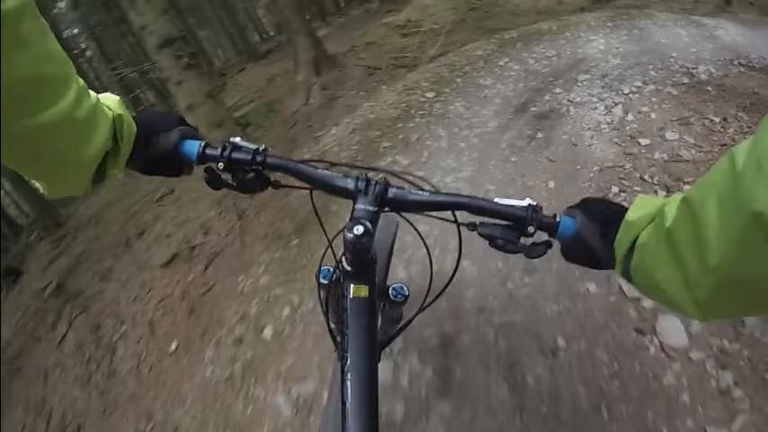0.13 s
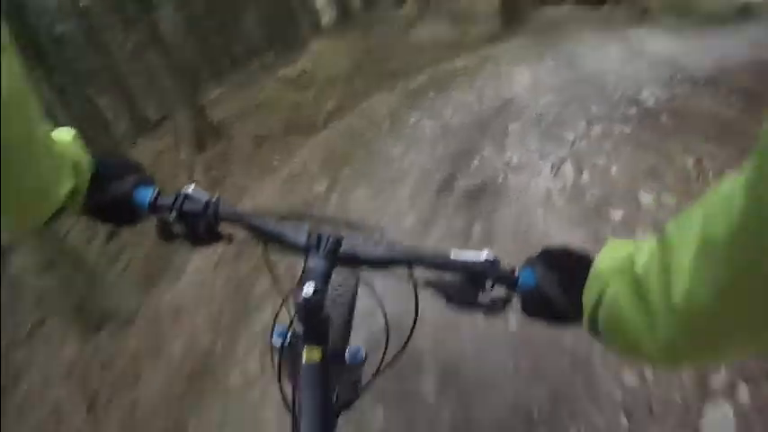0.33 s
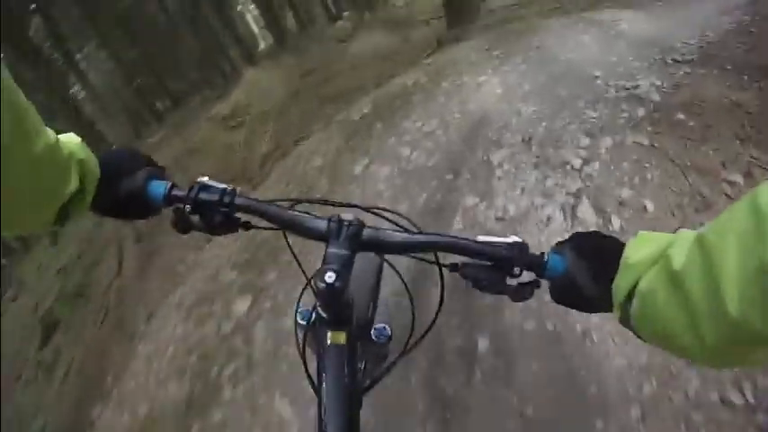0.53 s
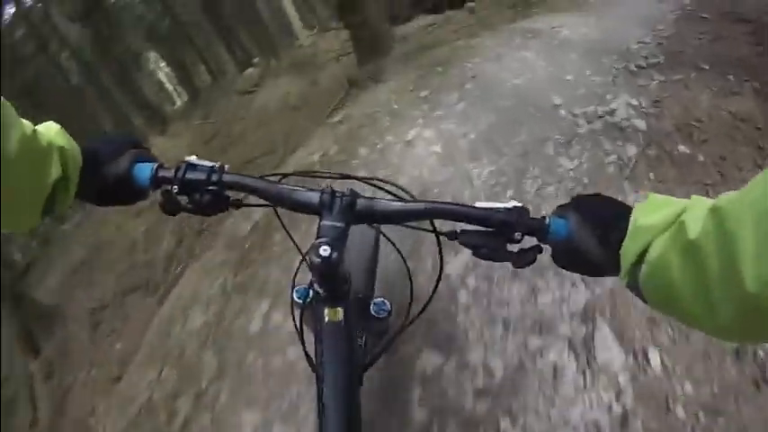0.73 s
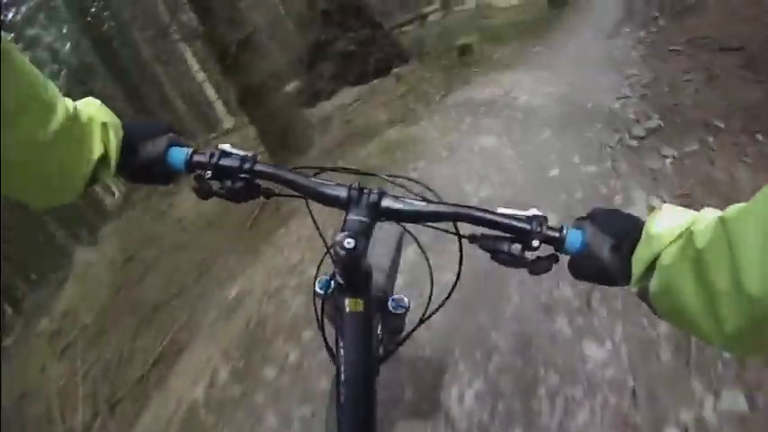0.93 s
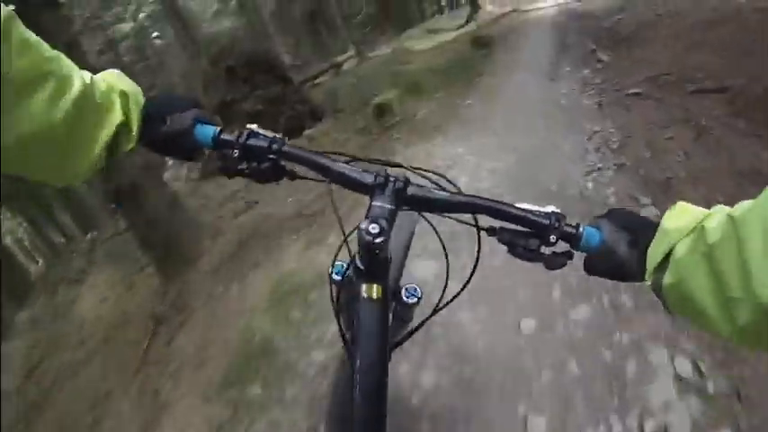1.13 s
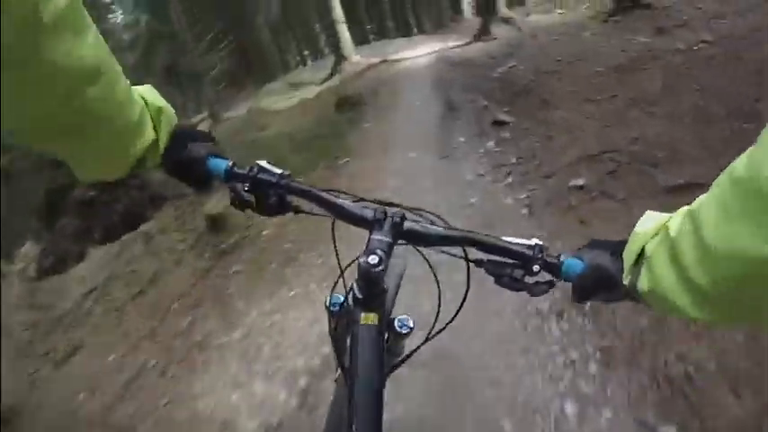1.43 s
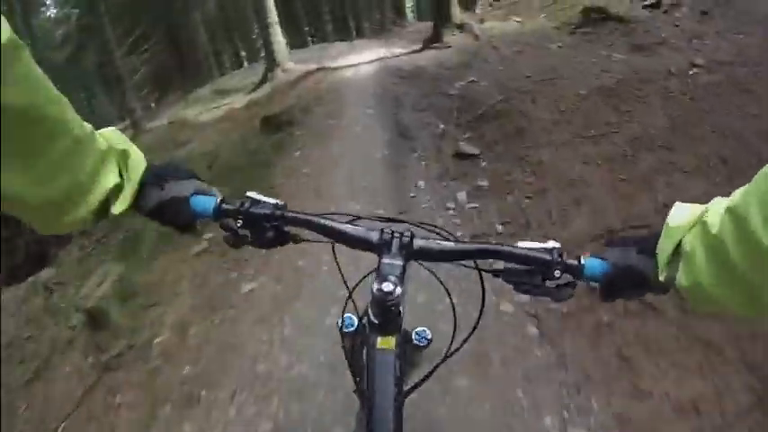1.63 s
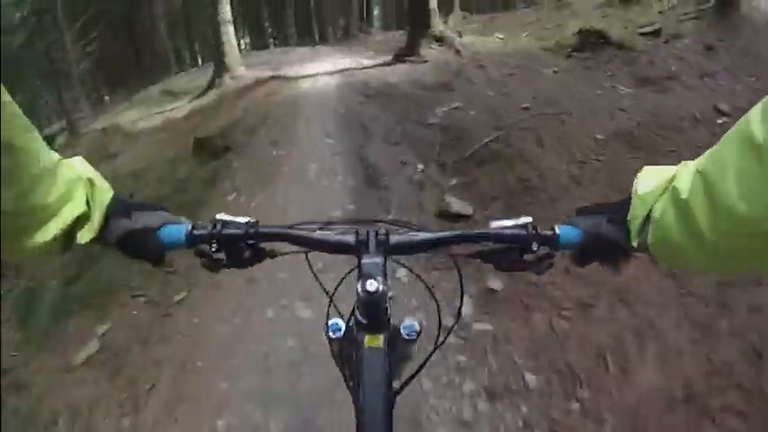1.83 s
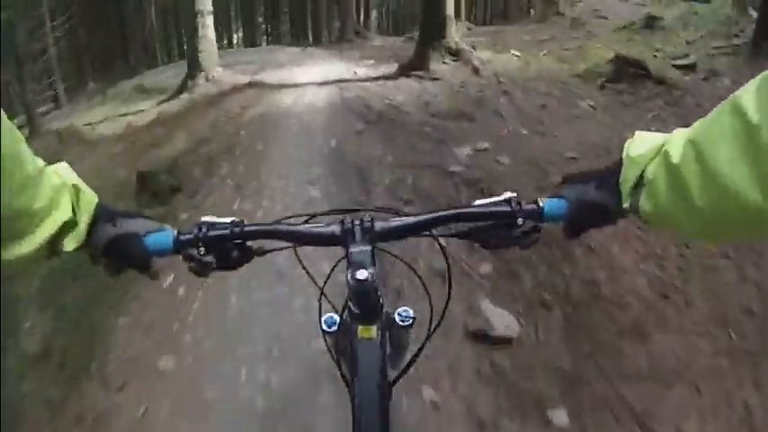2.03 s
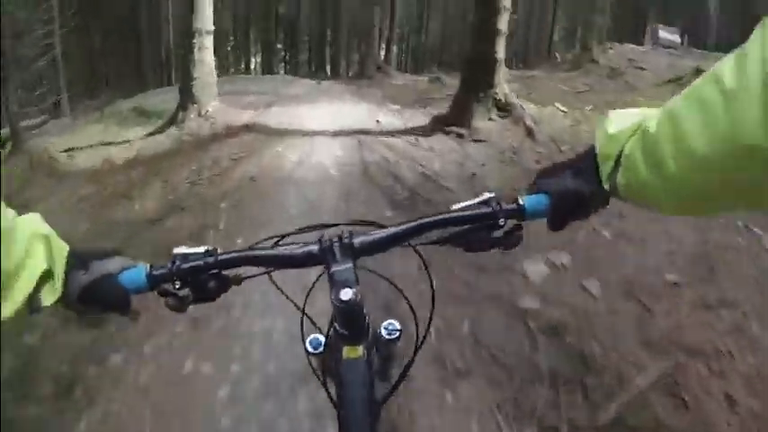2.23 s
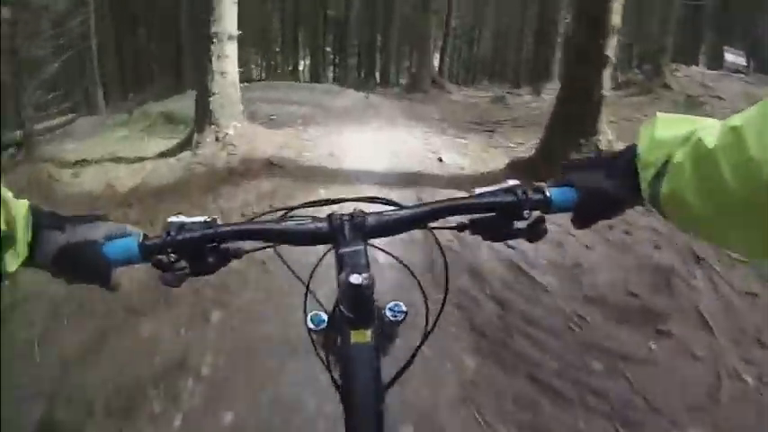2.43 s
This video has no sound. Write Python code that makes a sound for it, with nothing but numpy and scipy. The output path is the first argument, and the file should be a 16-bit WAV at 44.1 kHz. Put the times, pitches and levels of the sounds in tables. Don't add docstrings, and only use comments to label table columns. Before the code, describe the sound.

Hard clacking of a buckle against a plastic case, very close and dry; it follows fabric scuffing and one heavy low thump, with small rattling bounces between knocks and faint air and tyre rumble on a forest trail.

```python
import sys
import numpy as np
from scipy import signal
from scipy.fft import rfft, irfft
from scipy.io import wavfile

SR = 44100
rng = np.random.default_rng(int(sys.argv[2]) if len(sys.argv) > 2 else 0)


def attenuation_scalar(level_db):
    decades = np.asarray(level_db, float) / 20
    return 10 ** decades


def wav_out(sig):
    wavfile.write(sys.argv[1], SR, np.round(np.clip(np.atleast_2d(sig).T, -1, 1) * 32767).astype(np.int16))


N = 114660

# time in seconds, level in dB.
JOLTS = [(0.0, -42), (0.2, -32.5), (0.3, 19), (0.36, -40.5), (.55, -55.5), (.75, -65.5), (.82, -54.5),
         (1.05, -58), (1.28, -36.5), (1.38, -61), (1.85, -58), (2.6, -56.5)]
# time in seconds, level in dB.
TYRE_LEVELS = [(0.0, -49.5), (0.22, -43), (0.27, -19), (0.58, -71), (.69, -57), (.75, -66), (.88, -59.5),
               (1.0, -61.5), (1.28, -48), (1.38, -67), (1.7, -61), (1.82, -73), (1.87, -55.5),
               (1.97, -71.5), (2.18, -72), (2.26, -53), (2.36, -66.5), (2.6, -65.5)]
# time in seconds, signed size, width in ms.
BUMP_PUSHES = [
    (0.26, -0.11, 16),
    (0.28, 0.31, 4.9),
    (0.292, -0.39, 5.7),
    (0.297, -0.4, 9.8),
    (0.315, 0.18, 13.3),
    (0.331, -0.11, 1.8),
]
# time in seconds, level in dB, brightness 0-1.
RUBBING = [(0.0, -52.5, 0.52), (0.28, -39.5, 0.3), (0.43, -59.5, 0.62), (.62, -64.5, 0.47),
           (.75, -65, 0.51), (.95, -60.5, 0.38), (1.23, -53.5, 0.46), (1.32, -74.5, 0.67),
           (1.46, -64.5, .3), (1.62, -73, 0.33), (2.02, -72, 0.42), (2.27, -65.5, 0.76), (2.6, -67, 0)]
# start in seconds, peak in dB, length in ms, brightness 0-1.
STRAP_SCUFFS = [(0.046, -35.5, 7.8, 0.06), (0.137, -43.5, 4.2, 0.92), (.171, -58, 3.3, 0.8),
                (0.185, -41.5, 3.4, 1), (0.2, -38, 13.3, 1), (0.218, -30.5, 3.5, 0.74),
                (0.241, -55, 6.9, 0.8), (0.253, -34.5, 12.3, 1), (0.266, -27, 8.7, 1),
                (0.279, -22.5, 3.2, 0.95), (0.316, -31, 7.7, 1), (0.32, -30.5, 13, 0.34),
                (0.332, -33, 27, 0.52), (0.488, -58, 4.9, .9), (1.243, -40, 24, 0.29),
                (1.279, -48.5, 15.7, 0.9), (1.919, -46, 2.7, 1)]
# frequency in Hz, density in dB per Hz.
DULL_COLOUR = [(150, -31), (250, -13.5), (1060, -1.5), (1530, 9), (2700, 0), (2930, -6.5), (3080, 5.5),
               (4920, -10.5), (12000, -44), (15600, -56.5), (22000, -120)]
# frequency in Hz, density in dB per Hz.
BRIGHT_COLOUR = [(150, -24), (250, -7), (857, -11.5), (2430, -0.5), (4230, -4.5), (4780, -5), (5780, -8),
                 (12600, -24), (15800, -49.5)]
# frequency in Hz, density in dB per Hz.
RATTLE_COLOUR = [(290, -49), (500, -24), (1450, -0.5), (2450, -17.5), (2720, -19.5), (4230, -30.5),
                 (4690, -20.5), (6340, -27.5), (8000, -47.5), (10400, -75.5), (17600, -120)]
# frequency in Hz, width in Hz, gain.
CASE_RESONANCES = [(1540, 750, 0.92), (2000, 630, .6), (2310, 93, 0.94), (3900, 350, .5), (4540, 220, 1)]
# start in seconds, peak in dB, length in ms.
BUCKLE_BOUNCES = [(0.414, -30.5, 5.1), (.418, -32.5, 6.3), (0.606, -56.5, 8), (.638, -61, 13),
                  (0.78, -48, 3.7), (1.554, -53.5, 10), (1.613, -52, 7.8), (1.71, -45.5, 21),
                  (1.753, -47, 22.7), (1.898, -45, 30), (1.913, -53.5, 41), (1.95, -48.5, 15.5),
                  (2.065, -62, 5.1), (2.112, -41, 21.3), (2.134, -51, 27), (2.16, -55.5, 24),
                  (2.19, -57, 12.6), (2.25, -59, 29), (2.505, -51.5, 20.3), (2.521, -46, 24),
                  (2.526, -44.5, 7.9), (2.572, -68, 30)]
# time in seconds, strength, contact in ms.
KNOCK_EVENTS = [
    (.40046, 3.4, .1),
    (1.30963, 1.6, .12),
    (1.51579, 1.37, .127),
    (1.68219, 2, .105),
    (1.87296, 2.16, .12),
    (2.08528, .573, .153),
    (2.31755, 3.1, .148),
    (2.4802, .195, .18),
]
TOUCH_DELAYS_MS = [0, .928, 2.31, 4.41]
TOUCH_SHARES = [(1, 1.48, .74, 0), (1, 1.24, 1, -.27), (1, 1.26, 1.1, -.41), (1, 1.13, .97, -.2),
                (1, 1.29, .77, -.08), (1, 1.66, 1.48, -.62), (1, 1.32, .66, 0), (1, 1.69, 1.32, -.21)]
# frequency in Hz, signed gain, T60 in seconds.
WALL_MODES = [(953, -.11, .0076), (1691, 2.76, .00304), (1788, 1.235, .0118), (1856, -3.23, .0069),
              (2326, -1.06, .0026), (2871, -.09, .017)]
# frequency in Hz, level in dB, T60 in seconds.
CASE_MODES = [(1360, -35, .03), (2930, -25, .013), (3378, -26, .011), (3926, -26.5, 0.02),
              (4950, -21.5, 0.029), (5160, -27, .009), (6220, -23.5, 0.017), (8600, -31.5, 0.0028),
              (9700, -28.5, .005), (13000, -34.5, .004)]
# level in dB, treble tilt in dB per octave.
KNOCK_CRACKS = [(4, 0.85), (-0.5, -1.1), (-3, 1.5), (6.5, 2.2), (5.5, 5.4), (-17.5, 2.5), (-3, 8.2),
                (-28, 0.5)]
# frequency in Hz, level in dB, T60 in seconds.
FRAME_MODES = [(450, -10, .08), (923, -12, .09), (2393, 0, .095), (3052, -28, .17), (3451, -35, .22),
               (3607, -22, .15), (4745, -31, .2), (5642, -28, .15)]
# frequency in Hz, level in dB, T60 in seconds.
PIN_MODES = [(2848, -7, 1.3), (3204, -3, .5), (5109, -1, .42), (5281, -5, .3), (7228, -3, .2),
             (7348, -18, .3)]
# low bar, frame, low pin, mid pin and high pin, all in dB.
METAL_DRIVE_DB = [(-22.5, -26, -53.5, -56.5, -58.5), (-21, -29.5, -74.5, -65, -76.5),
                  (-22, -27, -71.5, -66, -69), (-26.5, -30.5, -62.5, -56, -63.5),
                  (-26, -29, -75, -56.5, -57), (-24.5, -32, -66, -73.5, -83),
                  (-32.5, -29, -65.5, -61.5, -60), (-29, -45.5, -81, -69, -84)]
DRIVE_COLUMNS = [1, 0, 1, 1, 1, 1, 1, 1, 2, 3, 3, 4, 4, 4]

JOLT_LOW_HZ, JOLT_HIGH_HZ, JOLT_PATCH_DB, JOLT_MAX_DB = 14, 45, 1.5, -30
TYRE_HZ, TYRE_WIDTH_HZ, TYRE_SKIRT, TYRE_PATCH_DB, TYRE_MAX_DB = 119, 59, 0.24, 3.5, -30.5
WIND_DB, WIND_LOW_HZ, WIND_HIGH_HZ = -10.5, 227, 750
FABRIC_GRAINS_PER_S, RATTLE_GRAINS_PER_S, GRAIN_SPREAD_DB, RUB_PATCH_DB = 1700, 4000, 3.5, 1.1
SHAKE_DB, HUM_HZ, HUM_WIDTH_HZ, HUM_GAIN = 2.5, 450, 76, 1.5
CHATTER_DB, CHATTER_T60_S = -12, 0.13
THUMP_HZ, THUMP_DB, THUMP_T60_S = 95, -13, 0.13
BUCKLE_SPREAD_DB, METAL_DELAY_S = 1.2, 0.003
CASE_SPREAD_DB, CRACK_CONTACT_MS, CRACK_MAX_CYCLES = 6.5, 0.041, 32
CLIP_LEVEL, CLIP_HARDNESS, CUTOFF_HZ = 0.94, 8.0, 15900

KNOCK_S, KNOCK_STRENGTH, CONTACT_MS = np.transpose(KNOCK_EVENTS)
KNOCK_START = (KNOCK_S * SR).astype(int) - 30


def rms_one(x):
    return x / np.sqrt(np.mean(x ** 2) + 1e-20)


def in_time(rows):
    s, *columns = np.transpose(rows)
    return [np.interp(np.arange(N) / SR, s, c) for c in columns]


def drift(rate_hz):
    r = np.exp(-80 * np.pi * rate_hz / SR)
    noise = rng.standard_normal(N // 40 + 2002)
    slow = signal.lfilter([1], [1, -2 * r, r * r], noise)[2000:]
    return np.interp(np.arange(N) / 40, np.arange(len(slow)), rms_one(slow))


def band_noise(low_hz, high_hz):
    sos = signal.butter(2, [low_hz, high_hz], "band", fs=SR, output="sos")
    return rms_one(signal.sosfilt(sos, rng.standard_normal(N)))


def ring(x, hz, t60_s):
    r, w = attenuation_scalar(-60 / (t60_s * SR)), 2 * np.pi * hz / SR
    return signal.lfilter([0, np.sin(w)], [1, -2 * r * np.cos(w), r * r], x + 1e-18)


def peak(x, hz, width_hz):
    r = np.exp(-np.pi * width_hz / SR)
    poles = [1, -2 * r * np.cos(2 * np.pi * hz / SR), r * r]
    return signal.lfilter([(1 - r * r) / 2, 0, (r * r - 1) / 2], poles, x)


def colour(x, spectrum):
    hz, db = np.transpose(spectrum)
    f = np.maximum(np.arange(N // 2 + 1) * SR / N, 1)
    gain_db = np.interp(np.log(f), np.log(hz), db, left=-90, right=-90)
    x = irfft(rfft(x) * attenuation_scalar(gain_db), N)
    return rms_one(x + sum(g * peak(x, hz, w) for hz, w, g in CASE_RESONANCES))


def puff(s, peak_db, ms):
    u = np.clip((np.arange(N) / SR - s) * 1000 / ms, 0, 30)
    return attenuation_scalar(peak_db) * 2 * u * np.exp(1 - 2 * u - u ** 3)


def grains(per_s):
    size_db = GRAIN_SPREAD_DB * np.minimum(rng.exponential(1, N), 4)
    clicks = attenuation_scalar(size_db) * rng.standard_normal(N) * (rng.random(N) < per_s / SR)
    return clicks + .5 * rng.standard_normal(N)


def wind():
    noise = band_noise(WIND_LOW_HZ, WIND_HIGH_HZ)
    return attenuation_scalar(in_time(RUBBING)[0] + WIND_DB + drift(17)) * noise


def body_jolts():
    noise = band_noise(JOLT_LOW_HZ, JOLT_HIGH_HZ)
    level_db = np.minimum(in_time(JOLTS)[0], JOLT_MAX_DB) + JOLT_PATCH_DB * drift(3.3)
    return attenuation_scalar(level_db) * noise


def tyre_drumming():
    once = peak(rng.standard_normal(N), TYRE_HZ, TYRE_WIDTH_HZ)
    drum = peak(once, TYRE_HZ, TYRE_WIDTH_HZ) + TYRE_SKIRT * once
    level_db = np.minimum(in_time(TYRE_LEVELS)[0], TYRE_MAX_DB) + TYRE_PATCH_DB * drift(3)
    return attenuation_scalar(level_db) * rms_one(drum)


def bump_thud():
    t = np.arange(N) / SR
    return sum(a * np.exp(-(2 * (t - s) * 1000 / ms) ** 2) for s, a, ms in BUMP_PUSHES)


def strap_rub():
    level_db, bright = in_time(RUBBING)
    level = attenuation_scalar(level_db + RUB_PATCH_DB * (drift(30) + drift(32)))
    dull, sharp = level * (1 - bright), level * bright
    for s, peak_db, ms, share in STRAP_SCUFFS:
        scuff = puff(s, peak_db, ms)
        dull = dull + scuff * (1 - share)
        sharp = sharp + scuff * share
    dull_sound = dull * colour(grains(FABRIC_GRAINS_PER_S), DULL_COLOUR)
    return dull_sound + sharp * colour(grains(FABRIC_GRAINS_PER_S), BRIGHT_COLOUR)


def metal_drive(level_db):
    x = np.zeros(N)
    x[KNOCK_START + int(METAL_DELAY_S * SR)] = attenuation_scalar(level_db)
    return x


def buckle_rattle():
    r = attenuation_scalar(-60 / (CHATTER_T60_S * SR))
    frame = metal_drive(np.array(METAL_DRIVE_DB)[:, 1])
    chatter = attenuation_scalar(CHATTER_DB) * signal.lfilter([1], [1, -r], frame)
    shake = chatter + sum(puff(*row) for row in BUCKLE_BOUNCES)
    shake = shake * attenuation_scalar(SHAKE_DB * drift(100))
    rattle = shake * colour(grains(RATTLE_GRAINS_PER_S), RATTLE_COLOUR)
    return rattle + HUM_GAIN * peak(shake * rng.standard_normal(N), HUM_HZ, HUM_WIDTH_HZ)


def case_thump():
    push = np.convolve(metal_drive(np.array(METAL_DRIVE_DB)[:, 1]), np.hanning(40) / 20)[:N]
    return -ring(push * attenuation_scalar(THUMP_DB), THUMP_HZ, THUMP_T60_S)


def metal_ring():
    out = np.zeros(N)
    for (hz, db, t60_s), column in zip(FRAME_MODES + PIN_MODES, DRIVE_COLUMNS):
        spread_db = BUCKLE_SPREAD_DB * rng.standard_normal(len(KNOCK_S))
        drive = metal_drive(np.array(METAL_DRIVE_DB)[:, column] + db + spread_db)
        out += ring(np.convolve(drive, np.hanning(5) / 2)[:N], hz, t60_s)
    return out


def touches(contact_ms, gain):
    wide = np.reshape(contact_ms, (-1, 1))
    ms = np.arange(300) / SR * 1000 + ((KNOCK_START / SR - KNOCK_S) * 1000)[:, None]
    force = sum(share[:, None] * np.exp(-((ms - delay) / wide) ** 2)
                for delay, share in zip(TOUCH_DELAYS_MS, np.transpose(TOUCH_SHARES)))
    x = np.zeros(N)
    x[KNOCK_START[:, None] + np.arange(300)] = gain[:, None] * force / (wide * np.sqrt(np.pi) * SR / 1000)
    return x


def case_crack():
    crack_db, tilt = np.transpose(KNOCK_CRACKS)
    out = np.zeros(N)
    for hz, db, t60_s in CASE_MODES:
        spread_db = CASE_SPREAD_DB * rng.standard_normal(len(KNOCK_S))
        gain = attenuation_scalar(db + crack_db + tilt * np.log2(hz / 3000) + spread_db)
        out += ring(touches(CRACK_CONTACT_MS, gain), hz, min(t60_s, CRACK_MAX_CYCLES / hz))
    return out


def wall_knock():
    push = np.roll(touches(CONTACT_MS, KNOCK_STRENGTH), -1)
    return sum(g * ring(push, hz, t60_s) for hz, g, t60_s in WALL_MODES)


def scene():
    knocks = wall_knock() + case_crack() + metal_ring() + case_thump()
    friction = strap_rub() + buckle_rattle()
    ride = wind() + body_jolts() + tyre_drumming() + bump_thud()
    return (knocks + friction + ride)[None]


def band_limit(x):
    return signal.sosfilt(signal.butter(12, 15970, fs=SR, output="sos"), x)


def record(dry):
    hot = dry / (1 + np.abs(dry / CLIP_LEVEL) ** CLIP_HARDNESS) ** (1 / CLIP_HARDNESS)
    low_pass = signal.cheby2(8, 50, CUTOFF_HZ, fs=SR, output="sos")
    return band_limit(signal.sosfilt(low_pass, hot))


dry = scene()
out = record(dry)
wav_out(out)
```